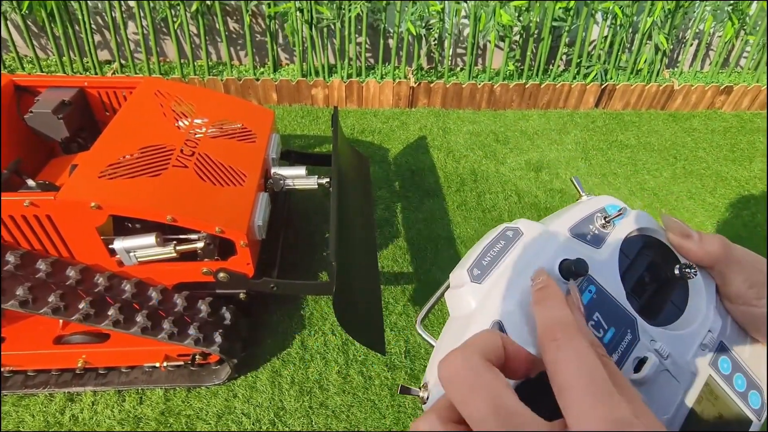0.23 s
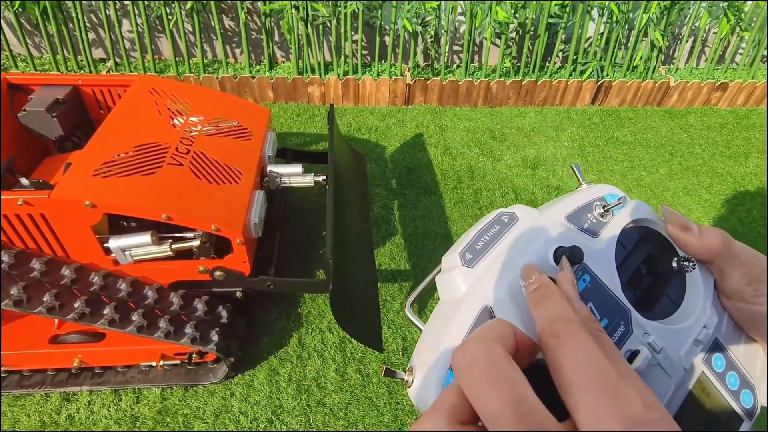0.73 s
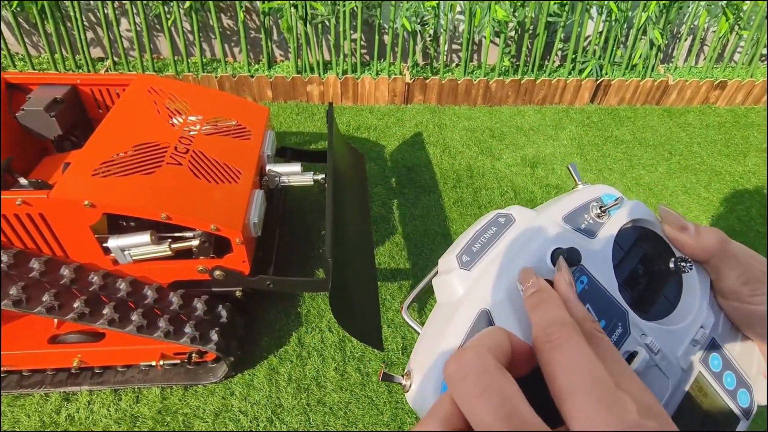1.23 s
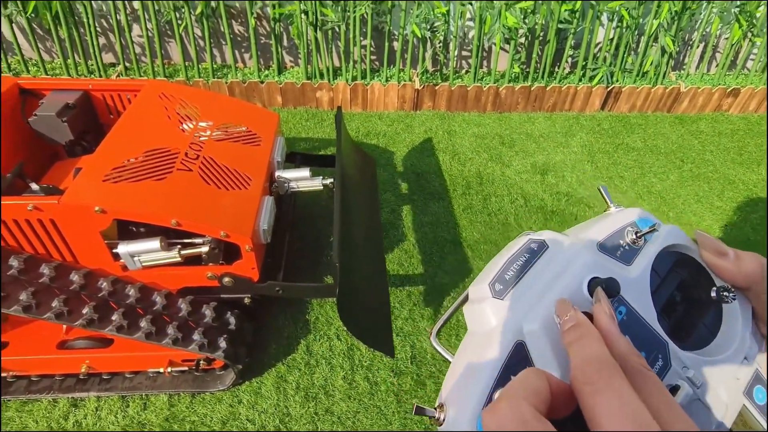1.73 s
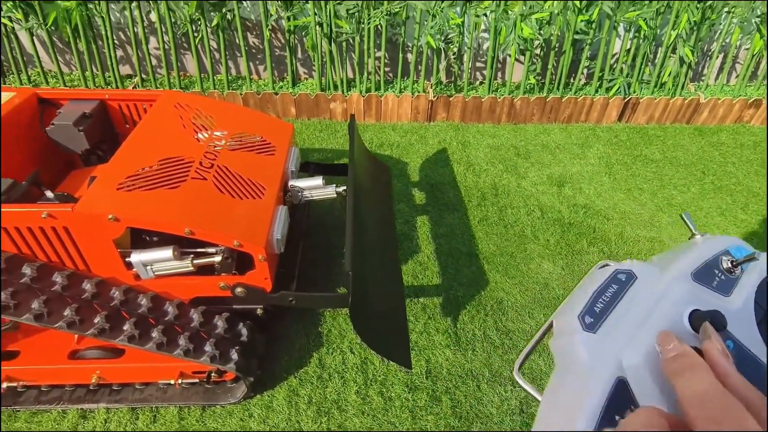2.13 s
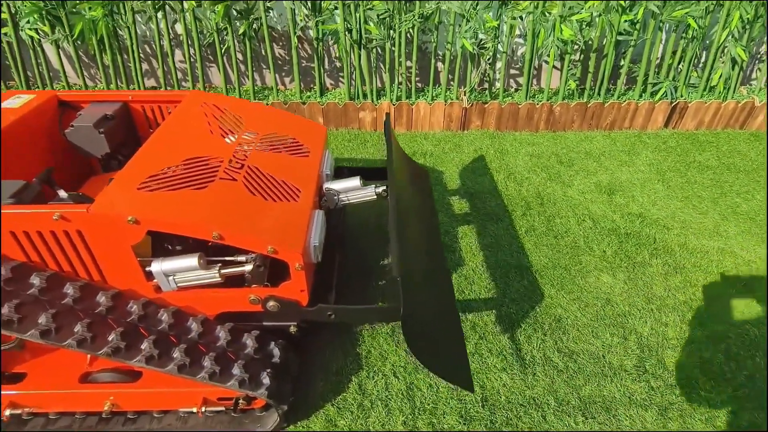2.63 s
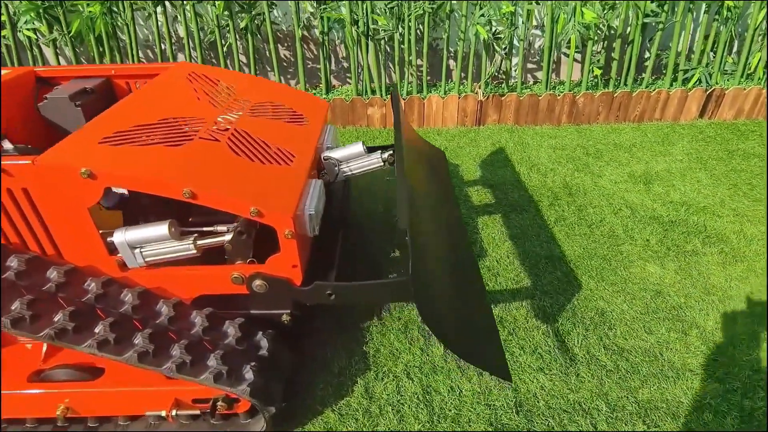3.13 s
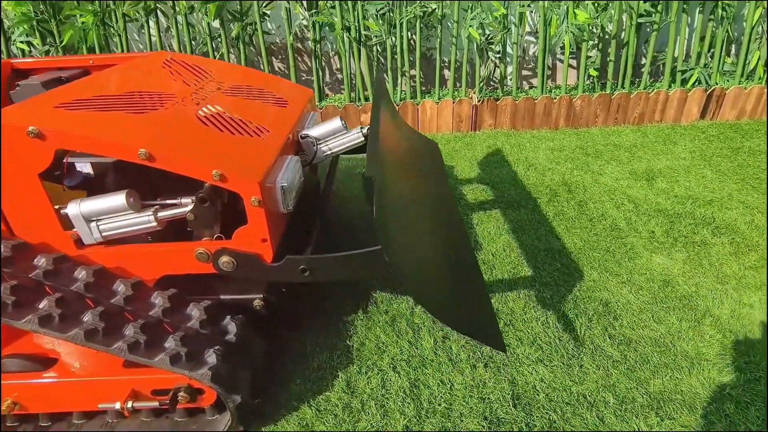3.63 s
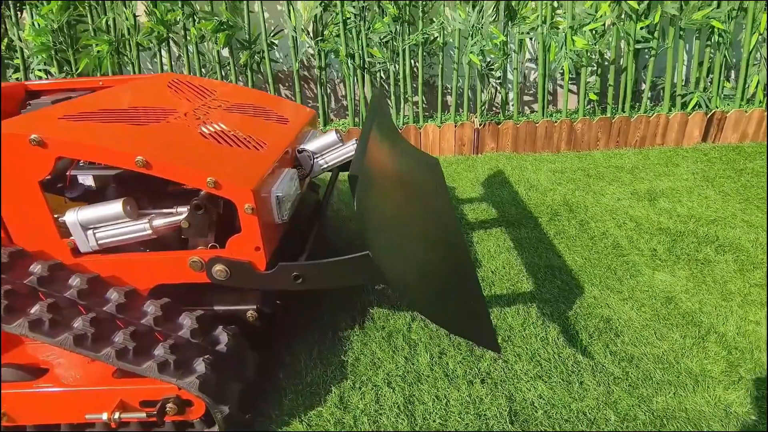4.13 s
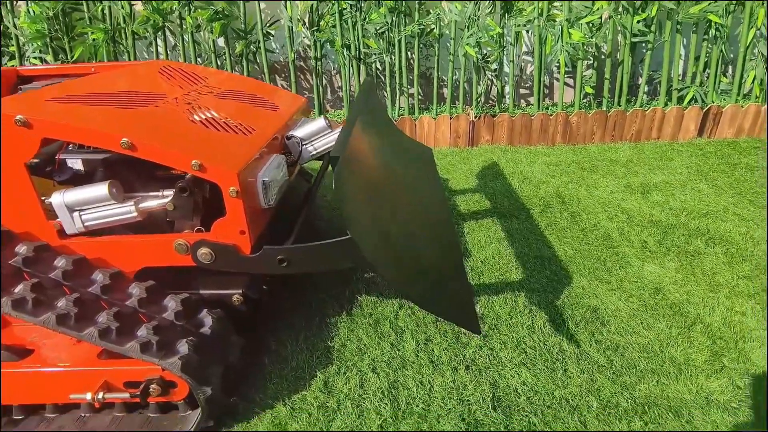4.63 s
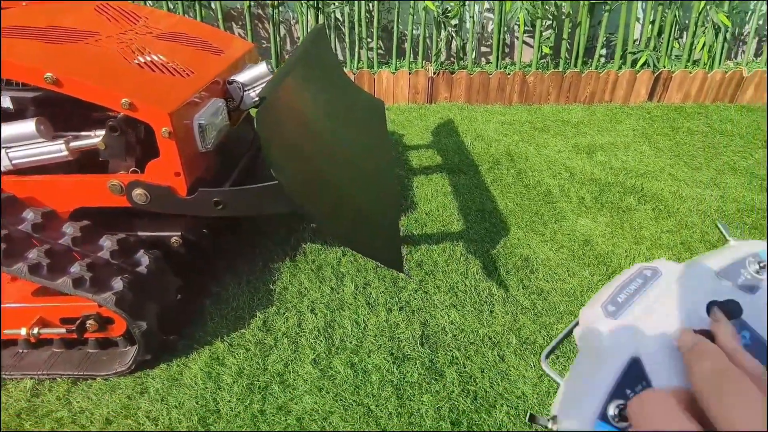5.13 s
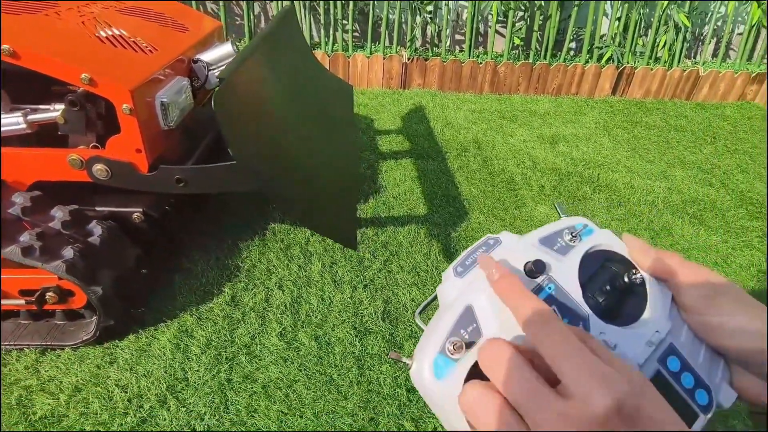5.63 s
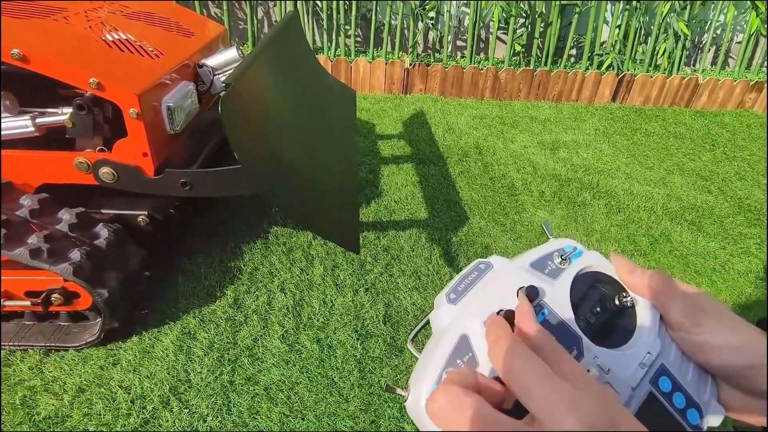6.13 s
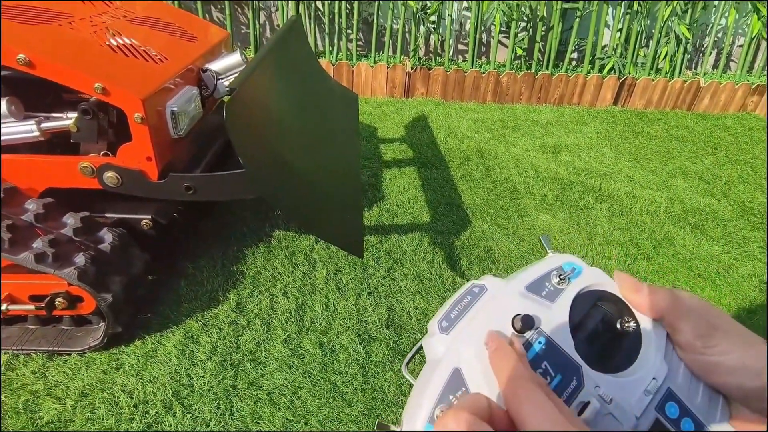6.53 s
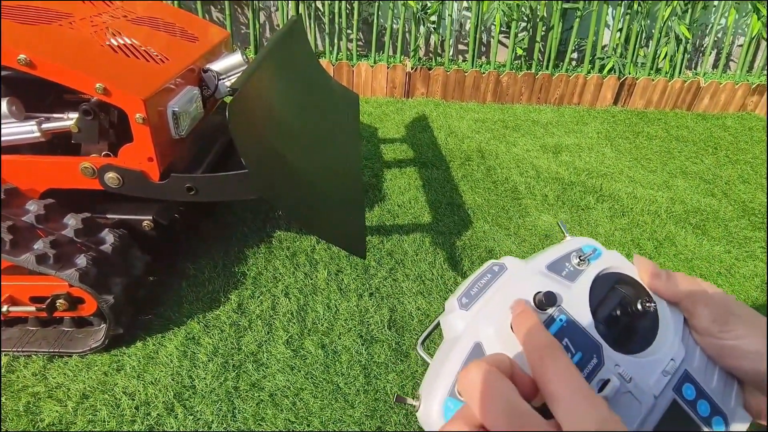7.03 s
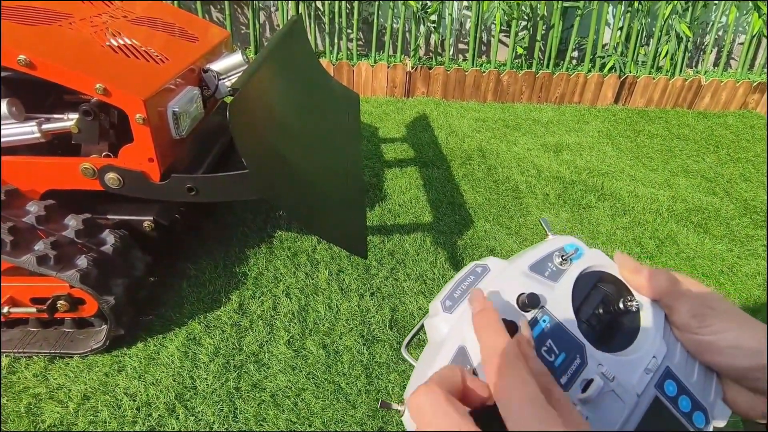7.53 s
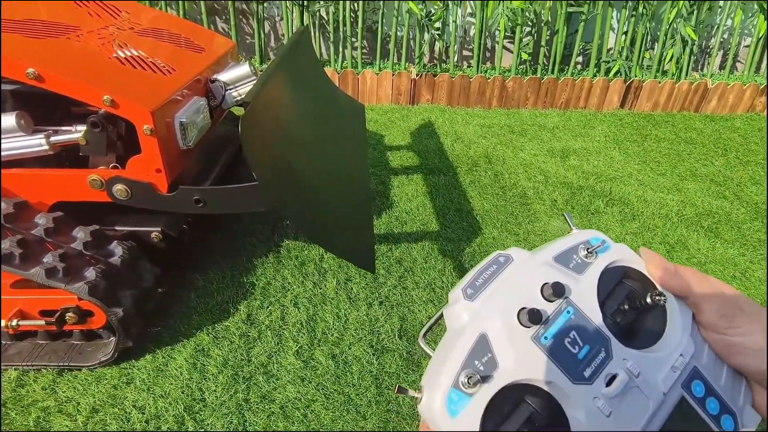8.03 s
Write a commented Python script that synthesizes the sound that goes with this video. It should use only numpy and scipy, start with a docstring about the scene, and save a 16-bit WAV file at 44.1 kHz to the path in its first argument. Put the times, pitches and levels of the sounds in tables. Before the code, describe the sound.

After a soft puff of breeze on the microphone and a faint click, a geared electric motor rises into a metallic, rattling whine, raising the blade of a tracked machine. It strains, getting louder and slightly lower, and cuts off. Plastic clicks, soft bumps, hand rustles and a brief shoe scuff follow over a faint distant outdoor rumble. Finally the motor starts again, rising to a slightly higher, steady whine.

```python
"""First a puff of breeze rumbles while hands rustle over a radio controller and click its knob.
Then an electric actuator, a motor-driven screw, lifts the plough blade of a tracked machine and slows
under the load. Its 14-tooth gear whines and rattles, its screw hisses and the steel body rings along.
In the pause the knob clicks again and a shoe scuffs on artificial turf. Then the blade starts to sink."""
import sys
import numpy as np
from scipy import signal
from scipy.fft import rfft, irfft, next_fast_len
from scipy.io import wavfile
from scipy.ndimage import uniform_filter1d

SR = 44100
rng = np.random.default_rng(int(sys.argv[2]) if len(sys.argv) > 2 else 0)


def persist_wave(psi):
    """Save psi, clipped to +-1, as 16-bit WAV."""
    counts = np.round(np.clip(psi, -1, 1) * 32767).astype(np.int16)
    wavfile.write(sys.argv[1], SR, np.atleast_2d(counts).T)


N = 366030
TIME = np.arange(N) / SR
COARSE = 40   # slow changes are worked out once in this many samples
FFT_SIZE = next_fast_len(N)
FFT_HZ = np.arange(FFT_SIZE // 2 + 1) * SR / FFT_SIZE


def from_db(db):
    """Turn decibels into a gain."""
    return 10 ** (np.asarray(db) / 20)


def rms_one(x):
    """Scale a signal to an average power of 1."""
    return x / np.sqrt(np.mean(x ** 2) + 1e-20)


def in_time(rows):
    """Join the rows of a timed table into one curve for each column."""
    seconds, *columns = np.transpose(rows)
    return [np.interp(TIME, seconds, column) for column in columns]


def during(start_s, stop_s, attack_s, release_s):
    """1 from start to stop, swelling before and dying away after."""
    outside = np.maximum((start_s - TIME) / attack_s, (TIME - stop_s) / release_s)
    return np.exp(-np.maximum(0, outside)) + 1e-12


def swells(rows):
    """A loudness curve made of bell-shaped swells."""
    return np.sqrt(sum(from_db(2 * db) * np.exp(-np.minimum(2 * ((TIME - s) / half) ** 2, 60))
                       for s, half, db in rows))


def wander(rate):
    """A smooth random curve in coarse steps, about 1 in size, with about `rate` turns a second."""
    r = np.exp(-2 * np.pi * COARSE * rate / SR)
    noise = rng.standard_normal(len(TIME[::COARSE]) + 2000)
    return rms_one(signal.lfilter([1], [1, -2 * r, r * r], noise)[2000:])


def drift(rate):
    """A wandering curve filled in at every sample."""
    return np.interp(TIME, TIME[::COARSE], wander(rate))


def air(alike):
    """White stereo noise; `alike` runs from 0 (unrelated sides) to 1 (equal sides)."""
    mid, side = rng.standard_normal((2, N))
    return rms_one(np.sqrt(1 + alike) * mid + np.sqrt(1 - alike) * side * [[1], [-1]])


def at_hz(spectrum, hz):
    """Look up the gain of a tone-colour table at the given pitches."""
    points, db = np.transpose(spectrum)
    return from_db(np.interp(np.log(np.maximum(hz, 1)), np.log(points), db))


def colour(x, spectrum):
    """Give a sound a tone colour and an average power of 1."""
    return rms_one(irfft(rfft(x, FFT_SIZE) * at_hz(spectrum, FFT_HZ), FFT_SIZE)[..., :N])


def muffle(x, hz):
    """Take away the treble above a pitch."""
    return signal.sosfilt(signal.butter(4, hz, fs=SR, output="sos"), x)


def resonate(x, hz, width):
    """Let a sound ring at one pitch; the narrower the width in Hz, the longer it rings."""
    r = np.exp(-np.pi * width / SR)
    feedback = [1, -2 * r * np.cos(2 * np.pi * hz / SR), r * r]
    return signal.lfilter(np.array([1, 0, -1]) * (1 - r * r) / 2, feedback, x + 1e-18)


def strike(events, modes, contact_s):
    """Each blow is a brief rough contact that sets the tones of an object ringing."""
    out = np.zeros((2, N))
    t = np.arange(SR // 2) / SR
    for s, db, *brightness in events:
        ring = 0
        for hz, level, fade_s in modes:
            envelope = from_db(level + sum(brightness) * np.log2(hz) - 60 * t / fade_s)
            ring += envelope * np.sin(2 * np.pi * hz * t + rng.normal(0, .6, (2, 1)))
        contact = rng.standard_normal((1, len(t))) * np.exp(-t / contact_s)
        blow = signal.fftconvolve(ring, contact)[:, :len(t)]
        at = round(s * SR)
        out[:, at:at + len(t)] += from_db(db) * blow / np.abs(blow).max()
    return out


# Tone colours of the far rumble and of its part that comes from all sides.
# Each row: pitch in Hz, relative level in dB.
RUMBLE_COLOUR = [(40, -7), (100, 1.5), (150, -1.5), (215, -0.5), (300, -8), (420, -16), (700, -22),
                 (1100, -29.5), (1600, -35.5), (2500, -40.5), (5000, -49.5), (15000, -50)]
ALL_SIDES_COLOUR = [(100, -16), (220, -15.5), (400, -5), (700, -9), (1400, -18), (2500, -31.5), (6000, -44)]
def distance():
    """A steady far rumble and the thin tone of a far machine."""
    rumble = from_db(-49) * colour(air(.8), RUMBLE_COLOUR)
    all_sides = from_db(-60.5) * colour(rng.standard_normal(N), ALL_SIDES_COLOUR) * [[1], [-1]]
    far_machine = from_db(-81) * np.sqrt(2) * np.sin(2 * np.pi * 1123 * TIME)
    return rumble + all_sides + far_machine


# Puffs of wind. Each row: middle in seconds, half-length in seconds, relative level in dB.
GUSTS = [(.19, 0.18, -41.5), (.65, 0.37, -49.5), (2.58, 0.019, -47), (2.82, 0.037, -45), (4.36, 0.034, -50)]
# Tone colour of the wind. Each row: pitch in Hz, relative level in dB.
WIND_COLOUR = [(15, -9.5), (33, 1.5), (50, -2.5), (72, -3), (110, -10.5), (200, -20), (400, -78.5)]
def breeze():
    """Light wind rumbles on the microphone, a little louder on the right."""
    strength = from_db(6) * np.hypot(from_db(-57 + 3.5 * drift(12)), swells(GUSTS))
    return from_db([[-1.2], [1.2]]) * strength * colour(air(.68), WIND_COLOUR)


# Brushing movements. Each row: middle in seconds, half-length in seconds, relative level in dB.
RUSTLES = [(.07, 0.18, -59), (.42, 0.25, -70), (.71, 0.11, -66), (4.6, 0.095, -57), (4.83, 0.16, -62),
           (5.1, 0.12, -63.5), (5.47, 0.3, -57.5), (5.82, 0.056, -54.5), (5.95, 0.064, -60),
           (6.08, 0.13, -66.5), (6.34, 0.19, -60.5), (6.61, 0.055, -65.5), (7.0, 0.66, -71.5)]
# Tone colour of the brushing. Each row: pitch in Hz, relative level in dB.
SLEEVE_COLOUR = [(1000, -0.5), (2500, -4.5), (4500, -7.5), (7000, -2.5), (9300, -2), (11000, -10.5),
                 (16000, -6.5)]
def hands():
    """Hands and sleeves brush over the controller."""
    rubbing = air(.018) * from_db(1.1 * drift(70))
    return from_db(2) * swells(RUSTLES) * colour(rubbing, SLEEVE_COLOUR)


# Knob and switch clicks. Each row: start in seconds, relative peak in dB, brightness in dB per octave.
CLICKS = [(0.2399, -39, 0), (5.2665, -24.5, 1), (5.581, -31.5, 3), (5.9066, -41, 0), (5.9886, -38, -6),
          (6.3863, -29.5, -3)]
# Spring pings and soft bumps. Each row: start in seconds, peak level in dB.
PINGS = [(5.78, -58), (5.909, -46)]
BUMPS = [(.24, -35), (5.769, -28), (5.804, -41), (5.908, -33)]
# The tones of the plastic case, the spring and a bump.
# Each row: pitch in Hz, relative level in dB, seconds to fade by 60 dB.
PLASTIC_TONES = [(1302, 3, 0.037), (2130, 0, 0.013), (3450, -9, 0.0096), (4140, 10, 0.01),
                 (5000, 12.5, 0.0037), (6760, 7.5, 0.011), (8900, 7, 0.007), (11500, -9, .005)]
SPRING_TONES = [(1755, -23, .25), (3984, -24, .27), (5626, -21, .4), (8694, 0, .45)]
BUMP_TONES = [(165, -17, .08), (222, 0, .14), (330, -28, .05), (900, -30, .06)]
def controller():
    """Clicks ring the plastic case, a small spring pings and soft bumps thud."""
    clicks = from_db(-8.5) * strike(CLICKS, PLASTIC_TONES, contact_s=.004)
    pings = strike(PINGS, SPRING_TONES, contact_s=.00024)
    bumps = strike(BUMPS, BUMP_TONES, contact_s=.0003)
    return clicks + pings + bumps


# Slips of the sole. Each row: start in seconds, peak level in dB, brightness in dB per octave.
JERKS = [(5.613, -41, -1), (5.639, -29.5, 0), (5.648, -35.5, 5), (5.661, -33.5, -6.5), (5.679, -40, -1),
         (5.692, -35.5, 3), (5.712, -41, 8)]
# The tones of the sole. Each row: pitch in Hz, relative level in dB, seconds to fade by 60 dB.
SOLE_TONES = [(824, -2, 0.067), (1360, 8, 0.041), (1880, 1, 0.032), (2160, -4, 0.059), (3480, -5, 0.06),
              (4100, 1, 0.042), (5540, -12, .05)]
# Crunches of the grass. Each row: middle in seconds, half-length in seconds, level in dB.
CRUNCHES = [(5.65, 0.048, -48), (5.715, 0.07, -46), (5.815, 0.052, -46.5)]
# Tone colour of the grass. Each row: pitch in Hz, relative level in dB.
TURF_COLOUR = [(500, 0.5), (720, -4), (920, 10), (1150, -11), (1500, -5), (2600, -4.5), (3100, -0.5),
               (3550, 4.5), (4000, -1.5), (4900, -4.5), (5620, -2), (6200, -7), (8000, -17), (15000, -27)]
def shoe():
    """The sole slips in quick jerks while the plastic grass crunches under it."""
    grass = colour(air(.034) * from_db(1.7 * drift(110)), TURF_COLOUR)
    return strike(JERKS, SOLE_TONES, contact_s=.0062) + swells(CRUNCHES) * grass


GEAR_TEETH, MOTOR_SLOTS = 14, 12
LIFT_ON_S, LIFT_STOP_S = .975, 4.515
LOWER_ON_S, LOWER_STOP_S = 7.26, 8.401
SPIN_UP_HZ_PER_S, SINKING_HZ = 1150, 834   # both refer to the tooth rate: teeth meeting per second


def per_run(lift, lower):
    """One value for lifting, another from the moment lowering is switched on."""
    return np.where(TIME > LOWER_ON_S, lower, lift)


# The motor's speed under the rising blade. Each row: time in seconds, tooth rate in Hz.
LIFT_SPEED = [(1.65, 779.3), (1.71, 790), (1.8, 795.4), (2.01, 795), (2.15, 794), (2.3, 790.2),
              (2.4, 777.5), (2.85, 777.8), (3.05, 771.5), (3.35, 760.8), (3.65, 732.3), (3.85, 717),
              (4.11, 704), (4.3, 683.1), (4.52, 662.4)]
def motor():
    """The tooth rate in Hz climbs from each switch-on, up to the speed that the load allows."""
    climb = SPIN_UP_HZ_PER_S * (TIME - per_run(LIFT_ON_S, LOWER_ON_S))
    return np.clip(climb, 20, per_run(in_time(LIFT_SPEED)[0], SINKING_HZ))


def tooth_chatter(tooth_hz):
    """How much the loose teeth bounce, 0 to 1: only during spin-up, and less near full speed."""
    speeding_up = np.clip(np.gradient(tooth_hz) * SR / SPIN_UP_HZ_PER_S, 0, 1)
    smoothed = np.clip(uniform_filter1d(speeding_up, size=3000), 0, 1)
    return smoothed * np.interp(tooth_hz, (620.4, 827.4), (1, 0))


def soft_start(tooth_hz, pulse_hz=857, fade_from_hz=470):
    """The pulsed power supply makes the motor sing faintly while it is still slow."""
    phase = 2 * np.pi * np.cumsum(pulse_hz * (1 + .0092 * drift(38.4))) / SR
    easing = np.clip(1 - (tooth_hz - fade_from_hz) / 60, 0, 1)
    return easing * (np.sin(phase) + .74 * np.sin(2 * phase)) * from_db(2 * drift(25))


# Tone colours of the screw, lifting and lowering. Each row: pitch in Hz, relative level in dB.
LIFT_SCREW = [(3000, -27), (5500, -3), (7000, -4.5), (9000, -1), (10800, -8.5), (16000, -8.5)]
LOWER_SCREW = [(3000, -22), (5500, -2.5), (6500, -4), (8200, -4), (9500, 1.5), (10900, -3), (12200, -11.5),
               (16000, -7)]
def screw_hiss(tooth_phase, tooth_hz, speed):
    """The nut slides along the screw; under load its hiss brightens as it goes faster."""
    sliding = sum(during(start_s, stop_s, attack_s=.013, release_s=.0099)
                  for start_s, stop_s in ((1.26, LIFT_STOP_S), (7.645, LOWER_STOP_S)))
    level = sliding * from_db(-.5 + .44 * drift(7.6)) * np.minimum(tooth_hz / 553, 1) ** 4
    friction = air(.058) * (1 + .27 * np.cos(tooth_phase)) * from_db(.95 * drift(83))
    hiss = colour(friction, LIFT_SCREW)
    bright = speed ** 11
    loaded = bright * hiss + (1 - bright) * 1.64 * muffle(hiss, hz=7500)
    return level * per_run(loaded, colour(friction, LOWER_SCREW))


def tooth_knocks(tooth_phase, jitter_s=.0004):
    """Every tooth lands with its own strength and timing, turn after turn, amid sliding friction."""
    count = np.floor(tooth_phase / (2 * np.pi)).astype(int)
    at = np.flatnonzero(np.diff(count))
    tooth = count[at] % GEAR_TEETH
    strength = rng.permutation(np.linspace(-1.6, 1.6, GEAR_TEETH))[tooth]
    force = from_db(1.8 * strength + 3 * rng.standard_normal(N)[at])
    knocks = np.zeros((2, N))
    for side in knocks:
        late = .8 * rng.standard_normal(GEAR_TEETH)[tooth] + .4 * rng.standard_normal(N)[at]
        side[np.clip(at + (late * jitter_s * SR).astype(int), 0, N - 1)] = force
    for lag in (53, 127, 211):   # each knock spreads in time as it travels through the case
        allpass = np.r_[.65, np.zeros(lag), 1]
        knocks = signal.lfilter(allpass, allpass[::-1], knocks + 1e-18)
    friction = air(.1) * (1 + .5 * np.cos(tooth_phase)) * (1 + .3 * np.cos(tooth_phase / GEAR_TEETH))
    return rms_one(knocks) + .75 * rms_one(friction)


# The tones of the actuator's housing. Each row: pitch in Hz, width in Hz, relative level in dB.
HOUSING_TONES = [(1420, 44, -1.5), (1330, 17, -10.5), (1773, 48.9, -2), (2061, 11.2, 6.5), (2264, 29, 5.5),
                 (2535, 9, 3), (2696, 38, -5), (3055, 10, 0), (4270, 36, -3)]
# Tone colours of the tooth faces that lift and lower. Each row: pitch in Hz, relative level in dB.
LIFT_RATTLE = [(200, -19.5), (350, -11.5), (480, -12.5), (600, -11.5), (680, -13), (760, -12.5),
               (1000, -13), (1150, -12.5), (1380, -5), (2300, -5.5), (3000, -4.5), (3800, -10), (5500, -12),
               (6300, -16.5), (9000, -17.5), (15000, -50.5)]
LOWER_RATTLE = [(200, -9), (600, -13.5), (720, -9), (900, -11.5), (1250, -17.5), (1550, -11.5),
                (1900, -6.5), (2180, -13), (2500, -1), (3200, -7.5), (3900, -12.5), (5600, -9.5),
                (8000, -26.5), (15000, -44)]
def gear_rattle(tooth_phase, speed, lifting, lowering):
    """Knocking teeth ring the housing; slow teeth land softly and sound dull."""
    rattle = np.zeros((2, N))
    for running, spectrum, housing_db in ((lifting, LIFT_RATTLE, 4.5), (lowering, LOWER_RATTLE, 6.5)):
        knocks = tooth_knocks(tooth_phase)
        housing = sum(from_db(db) * resonate(knocks, hz, width) for hz, width, db in HOUSING_TONES)
        rattle += running * colour(knocks + from_db(housing_db) * housing, spectrum)
    bright = np.clip((speed - .3) / .4, 0, 1)
    softened = np.sqrt(1 - bright ** 2) * muffle(rattle, hz=2840) + bright * rattle
    return softened * from_db(-3.5 + 1.2 * drift(8.7))


# The gear case tones that bouncing teeth set off.
# Each row: pitch in Hz, width in Hz, relative level in dB when lifting, and when lowering.
BOUNCE_TONES = [(1390, 86, 2, 12), (1850, 63, 14, 4), (2010, 56, 16.5, 1), (2260, 55, 15, 7),
                (2490, 64, 2, 23), (2760, 51, 10, 16), (3040, 180, 12, 14), (3940, 120, 7, -4.5),
                (4280, 150, 7, 2.5), (5680, 90, 1, -1), (7100, 85, 3.5, 4)]
def bouncing_teeth():
    """Loose teeth bounce in the gaps between them and ring the gear case in uneven bursts."""
    bursts = rms_one(air(.033) * from_db(4 * drift(55)))
    return sum((-1) ** k * from_db(per_run(lift_db, lower_db)) * resonate(bursts, hz, width)
               for k, (hz, width, lift_db, lower_db) in enumerate(BOUNCE_TONES))


def bouncing_case(overtones, hz=2750, width=670):
    """The bouncing case lets one band of the high whine through strongly."""
    return from_db(per_run(13.5, 14.5)) * resonate(resonate(overtones, hz, width), hz, width)


def tube(x, spacing_hz=50):
    """The crowded tones of the actuator's tube give the treble a metallic grain."""
    grid = np.arange(0, SR / 2, spacing_hz)
    shared, *sides = rng.standard_normal((3, len(grid)))
    depth_db = np.interp(grid, (600, 3500), (0, 3))
    gains = [from_db(depth_db * (shared + side / 2) - depth_db ** 2 / 8) for side in sides]
    response = [np.interp(FFT_HZ, grid, gain) for gain in gains]
    return irfft(rfft(x, FFT_SIZE) * response, FFT_SIZE)[:, :N]


def cover_plate(rattle, hz=1570, width=240):
    """The gears shake the cover, whose hollow roar reaches left and right with opposite sign."""
    roar = resonate(resonate(rattle[0], hz, width), hz, width)
    return from_db(per_run(1, 16)) * roar * [[1], [-1]]


# The tones of the steel body. Each row: pitch in Hz, relative level in dB, seconds to fade by 60 dB.
STEEL_TONES = [(662, -18, .5), (1330, -14, .34), (1642, -6, .25), (1712, -12, .43), (1992, 3.5, .42),
               (2062, -1.5, .33), (2229, -5, .3), (2681, -16, .4)]
def steel_body(whine, rattle, gear_level, lifting, tight_db=-25.5):
    """The lifting load presses the actuator ever tighter against the body, which rings along."""
    contact = lifting * np.sqrt(np.minimum(gear_level / from_db(tight_db), 1))
    shaking = contact * (from_db(9.5) * whine + from_db(5.5) * rattle)
    return sum(from_db(db) * resonate(shaking, hz, width=np.log(1000) / (np.pi * fade_s))
               for hz, db, fade_s in STEEL_TONES)


# How well the gear case gives off the whine. Each row: pitch in Hz, relative level in dB.
CASE_COLOUR = [(450, -31), (555, -19), (630, -24), (720, -15), (778, -21), (795, -13), (900, -5.5),
               (1100, -2), (1330, -14), (1600, -17.5), (1690, -7), (1900, -6), (2150, -13), (2400, -5),
               (2800, -13), (3170, -5.5), (3700, -10), (4250, -8), (4800, -14.5), (5600, -12.5),
               (6200, -31), (7100, -11), (8000, -23), (10000, -14)]
# The case's panels. Each row: pitch in Hz, width in Hz, relative level in dB, left minus right in dB.
PANELS = [(560, 30, -12.5, 2), (704, 21.3, -18.5, -3.5), (860, 23, -16.5, -5.5), (1407, 60, 0, -7),
          (1495.2, 15, 3.5, -8.5), (1537, 14, 6, -2.5), (1600.5, 13, 7.5, -2), (2018.4, 11, 8.5, 6.5),
          (2067.4, 28, 9, 5.5), (2272, 18.9, 5.5, 3.5), (2350, 36, 0.5, -5), (2505, 53, 8.5, -7),
          (2670, 34, 0, -4.5), (2727, 50, 3.5, 2.5), (2820, 23, -5, 5.5), (2923, 40, -1.5, 5.5),
          (3044.5, 33, -1.5, 1.5), (3120, 49, -8, -6.5), (3173, 27, -5.5, -11.5), (3440, 65, -4.5, -6),
          (3497, 110, 1, 4), (3950, 25, -25, 1.5), (4090, 50, -7.5, -0.5), (4260, 51, -4, 6.5),
          (4690, 75, -6.5, -12.5), (4985, 30, -10, 0.5)]
def case_gain(hz, chatter):
    """Panels sing out, left and right, as a tone glides across their pitch."""
    coarse_hz = hz[::100]
    built_up = 1 - .88 * chatter[::100]   # a fast glide leaves little time to start ringing
    power = at_hz(CASE_COLOUR, coarse_hz) ** 2
    for centre, width, db, pan_db in PANELS:
        peak = built_up * from_db(db) / (1 + 2 * ((coarse_hz - centre) / width) ** 2)
        sides = from_db([[pan_db], [-pan_db]])
        power = power + peak ** 2 * sides / sides.mean()
    return np.array([np.interp(TIME, TIME[::100], side) for side in np.sqrt(power)])


def ripple(hz, spacing_hz=39.4):
    """Small resonances and echoes make a gliding tone swell and fade on each side."""
    grid = np.arange(1000) * spacing_hz
    shared, *sides = rng.uniform(-1.7, 1.7, (3, len(grid)))
    return np.array([np.interp(hz, grid, rms_one(from_db(2.84 * (shared + side)))) for side in sides])


def smeared(x, chatter, fade_s=.1):
    """A fast glide leaves the many small tones of the case ringing behind it, so it breaks up."""
    t = np.arange(int(fade_s * SR)) / SR
    ring = rng.standard_normal((2, len(t))) * from_db(-60 * t / fade_s)
    ring /= np.linalg.norm(ring, axis=1, keepdims=True)
    share = .6 * chatter
    return np.sqrt(1 - share) * x + signal.oaconvolve(np.sqrt(share) * x, ring, axes=1)[:, :N]


# Echoes from the body and a fence put left and right out of step.
# Each row: pitch in Hz, gap between the sides in radians.
PHASE_GAPS = [(560, 2.3), (700, 1.3), (795, 1.5), (830, 2.6), (1250, 2.5), (1400, 1.1), (1490, 2.5),
              (1545, .6), (1580, 2.9), (1700, 2.8), (2050, 1), (2290, .6), (2360, 2.1), (2550, 2),
              (2950, .8), (3170, 1.1), (3330, 2.6), (4000, 1.5)]
def whine_tone(tooth_phase, tooth_hz, multiple, sway, rough, fade=.33):
    """One tone: the off-centre gear sways it each turn, friction roughens it, echoes make it fade."""
    turn = np.exp(1j * tooth_phase[::COARSE] / GEAR_TEETH)
    up, down, far_up, far_down = np.exp(2j * np.pi * rng.random(4))   # phases of four side tones
    lopsided = turn * (up + far_up * turn / 4) + turn.conj() * (down + far_down * turn.conj() / 4)
    strength = np.sqrt(2) * (1 + sway * lopsided + rough * (wander(45) + 1j * wander(25)))
    gap = np.exp(.5j * np.interp(multiple * tooth_hz[::COARSE], *np.transpose(PHASE_GAPS)))
    paths = [strength * (side + fade * (wander(3) + 1j * wander(3))) for side in (gap, gap.conj())]
    tone = np.exp(1j * multiple * tooth_phase)
    stereo = np.array([(tone * np.interp(TIME, TIME[::COARSE], path)).real for path in paths])
    return stereo / np.sqrt(1 + 2 * fade ** 2)


def slot_hum(tooth_phase, tooth_hz, speed):
    """The motor's slots hum just below the gear's pitch, once it turns fast."""
    hum = whine_tone(tooth_phase, tooth_hz, MOTOR_SLOTS / GEAR_TEETH, sway=.15, rough=.55)
    return from_db(per_run(-54, -58)) * speed ** 3 * hum


# The high tones of the whine. Each row: multiple of the tooth rate, relative level in dB.
OVERTONES = [(5, 0.5), (6, -2), (7, -1.5), (8, 0), (9, 2), (10, -6), (11, -8.5)]
def gear_overtones(tooth_phase, tooth_hz, chatter):
    """The high tones swell as they glide through pitches that the case gives off well."""
    out = np.zeros((2, N))
    for multiple, db in OVERTONES:
        hz = multiple * tooth_hz
        tone = whine_tone(tooth_phase, tooth_hz, multiple, sway=.24, rough=.45)
        out += from_db(db - 6.5) * case_gain(hz, chatter) * ripple(hz) * tone
    return smeared(out, chatter)


# The four main tones of the whine. Each row: multiple of the tooth rate, relative level in dB when
# lifting and when lowering, dB added at full chatter for each of the two, sway 0-1, roughness 0-1.
WHINE_TONES = [(1, 2.5, 6, 2, -2, 0.14, 0.5), (2, 3, -3.5, -9, 9, 0.13, 0.22),
               (3, 0.5, -1.5, 5.5, 0, 0.21, 0.2), (4, 1, 8, 2, -4.5, 0.27, 0.29)]
def gear_whine(tooth_phase, tooth_hz, chatter):
    """The meeting teeth whine; lifting and lowering press on opposite faces and so sound different."""
    weakened = from_db(chatter * (-1.5 + .92 * drift(36)))   # bouncing teeth whine less
    out = np.zeros((2, N))
    for multiple, lift_db, lower_db, lift_extra_db, lower_extra_db, sway, rough in WHINE_TONES:
        level_db = per_run(lift_db + lift_extra_db * chatter, lower_db + lower_extra_db * chatter)
        fade = .6 if multiple == 1 else .33
        tone = whine_tone(tooth_phase, tooth_hz, multiple, sway, rough, fade)
        out += from_db(level_db - 3.5) * case_gain(multiple * tooth_hz, chatter) * tone
    return weakened * smeared(out, chatter)


# The strain grows as the blade rises.
# Each row: time in seconds, relative level of the gears in dB, and of the screw's hiss in dB.
STRAIN = [(1.66, -37, -46), (2.33, -36.5, -43.5), (2.45, -33.5, -44.5), (3.22, -30.5, -44.5),
          (3.62, -28, -39), (4.1, -26.5, -40), (4.5, -26, -41)]
def actuator():
    """The motor's speed and strain drive the whine, rattle and hiss, first lifting, then lowering."""
    lifting = during(1.135, LIFT_STOP_S, attack_s=.026, release_s=.024)   # gears grip after switch-on
    lowering = during(7.6, LOWER_STOP_S, attack_s=.043, release_s=.024)
    running = lifting + lowering
    tooth_hz = motor()
    speed = np.minimum(tooth_hz / 650, 1)
    chatter = tooth_chatter(tooth_hz)
    wobble = .0011 * drift(14) + .008 * chatter * drift(35)
    tooth_phase = 2 * np.pi * np.cumsum(tooth_hz * (1 + wobble)) / SR
    lift_gear_db, lift_hiss_db = in_time(STRAIN)
    gear_level = from_db(per_run(lift_gear_db, -35)) * speed ** .96
    hiss_level = from_db(per_run(lift_hiss_db, -42.5))

    whine = gear_level * speed ** 1.9 * gear_whine(tooth_phase, tooth_hz, chatter)
    overtones = gear_level * speed * gear_overtones(tooth_phase, tooth_hz, chatter)
    hum = slot_hum(tooth_phase, tooth_hz, speed)
    tones = running * (whine + from_db(-8 * chatter) * overtones + hum)   # chatter weakens overtones
    rattle = gear_level * gear_rattle(tooth_phase, speed, lifting, lowering)
    loose_teeth = running * gear_level * speed ** .8 * bouncing_teeth()
    bounce = chatter * (loose_teeth + bouncing_case(running * overtones))
    hiss = hiss_level * screw_hiss(tooth_phase, tooth_hz, speed)
    body = steel_body(whine, rattle, gear_level, lifting)
    singing = running * from_db(per_run(-58.5, -59)) * soft_start(tooth_hz)
    return tones + tube(hiss + rattle) + cover_plate(rattle) + bounce + body + singing


def scene():
    """The machine, its operator and the open air."""
    return actuator() + controller() + hands() + shoe() + breeze() + distance()


def record(dry):
    """A steep filter cuts the treble above 15800 Hz."""
    return signal.sosfilt(signal.ellip(10, .1, 80, 15800, fs=SR, output="sos"), dry)


dry = scene()
out = record(dry)
persist_wave(out)
```